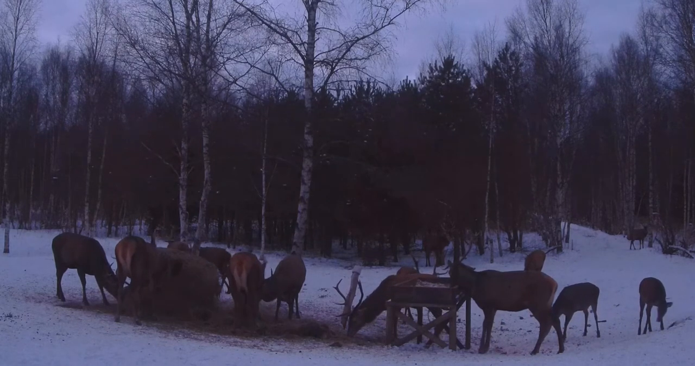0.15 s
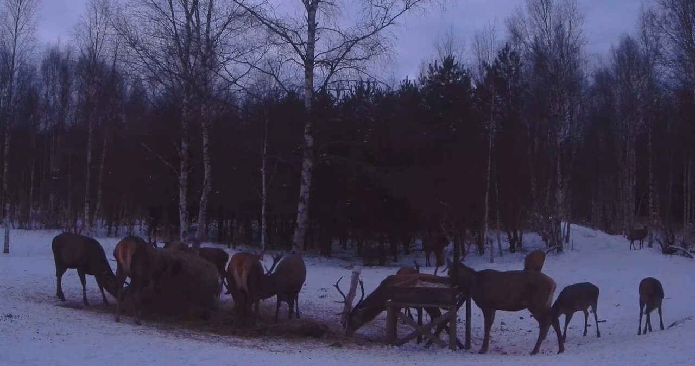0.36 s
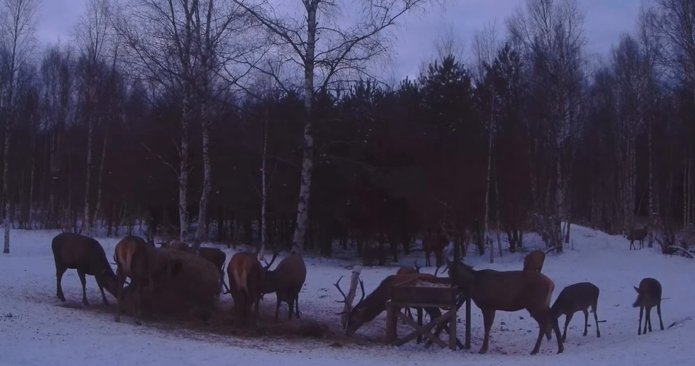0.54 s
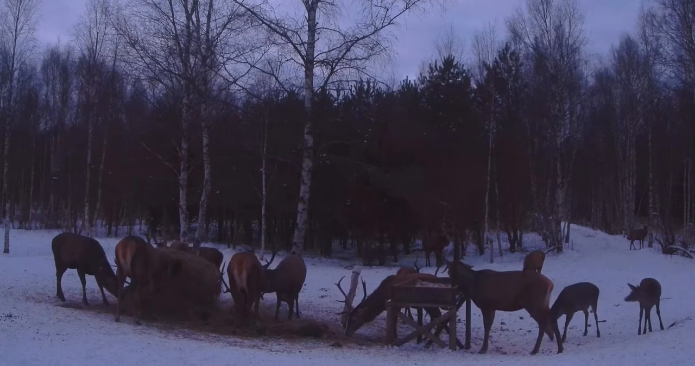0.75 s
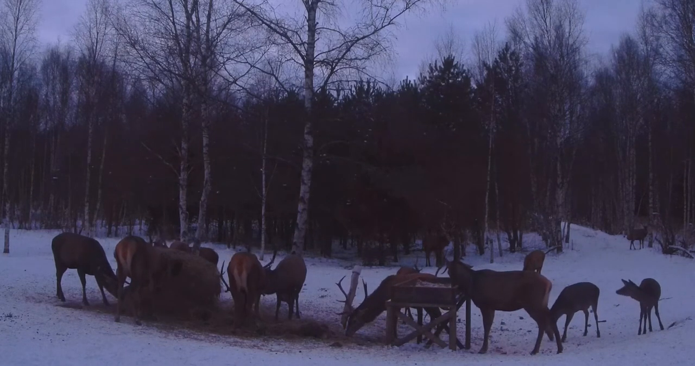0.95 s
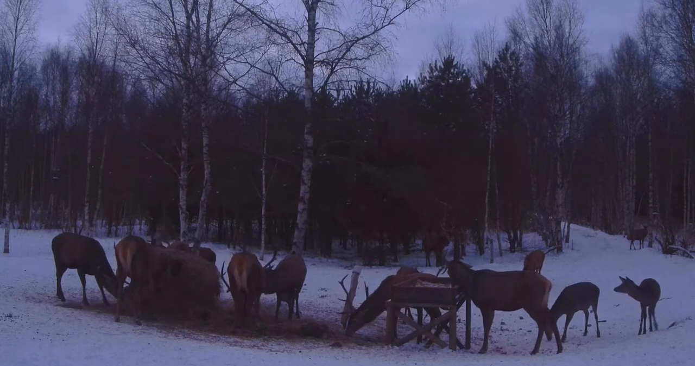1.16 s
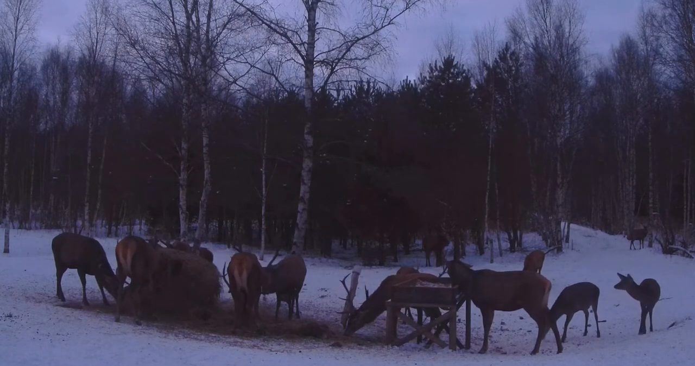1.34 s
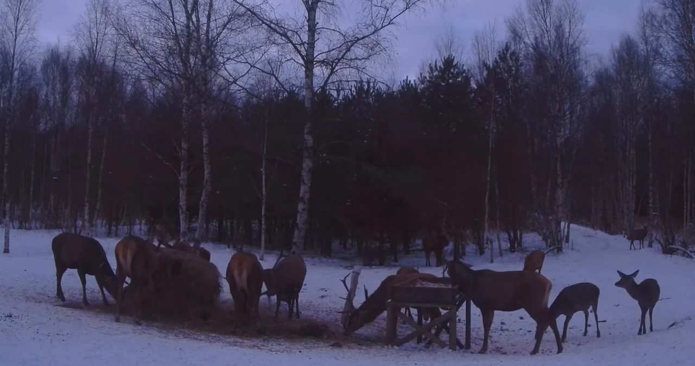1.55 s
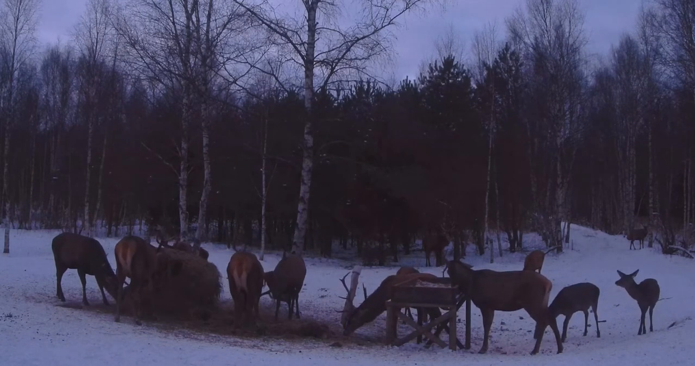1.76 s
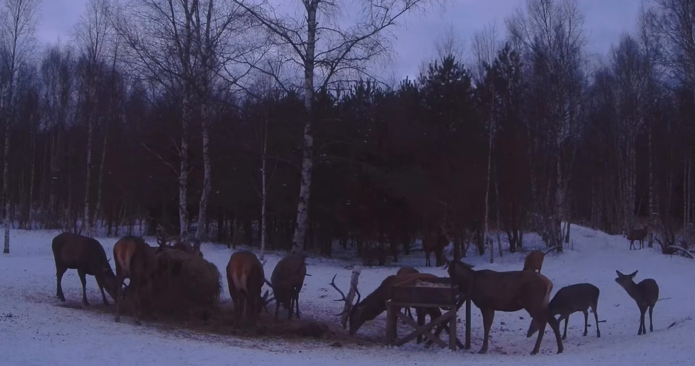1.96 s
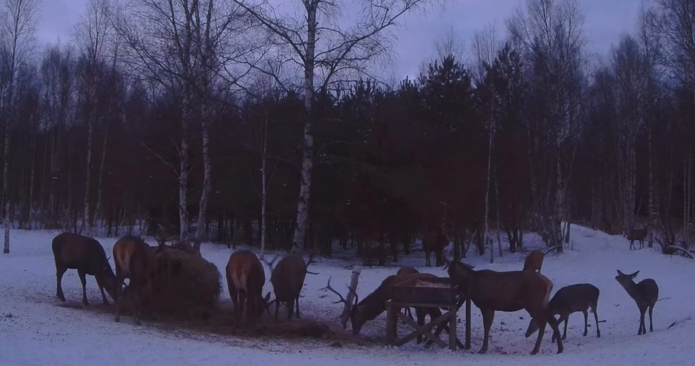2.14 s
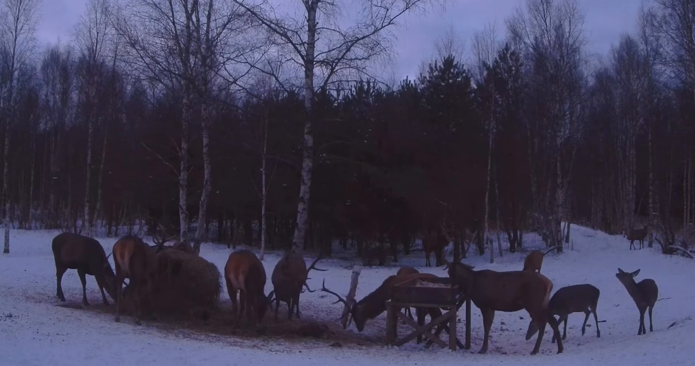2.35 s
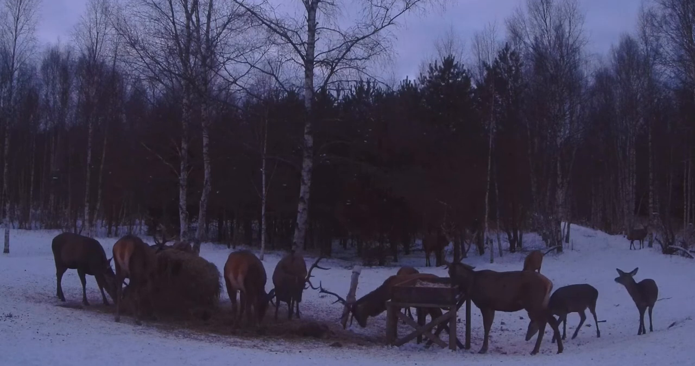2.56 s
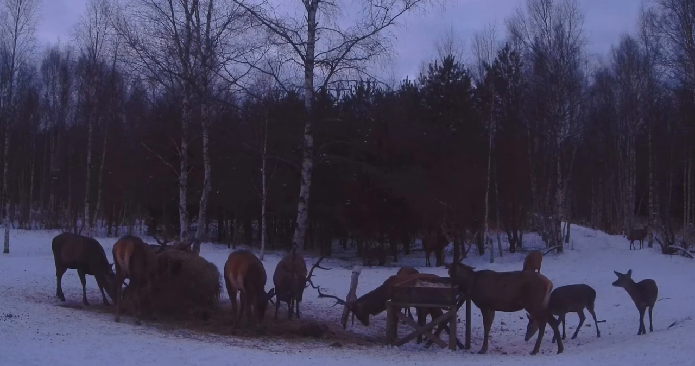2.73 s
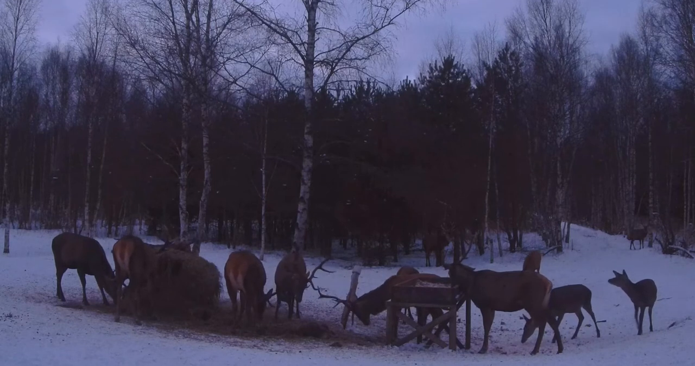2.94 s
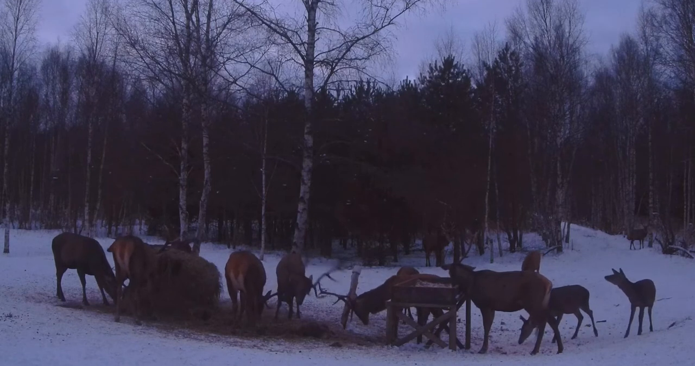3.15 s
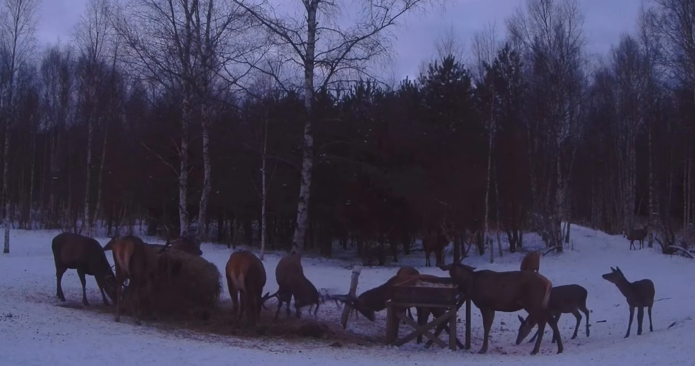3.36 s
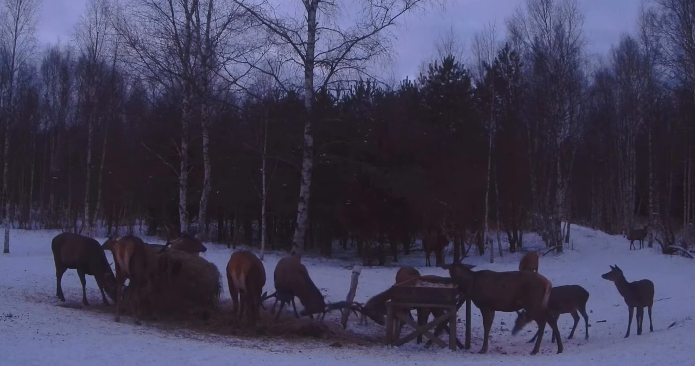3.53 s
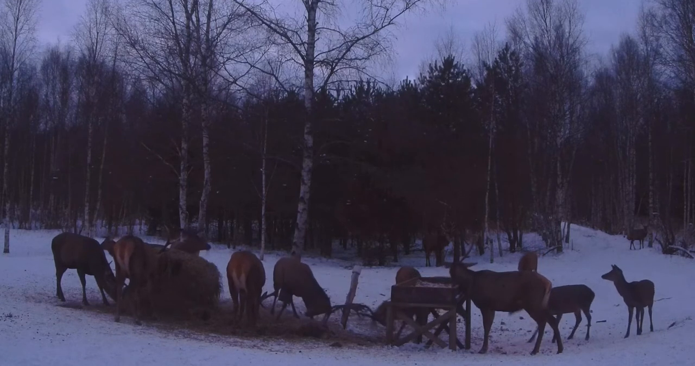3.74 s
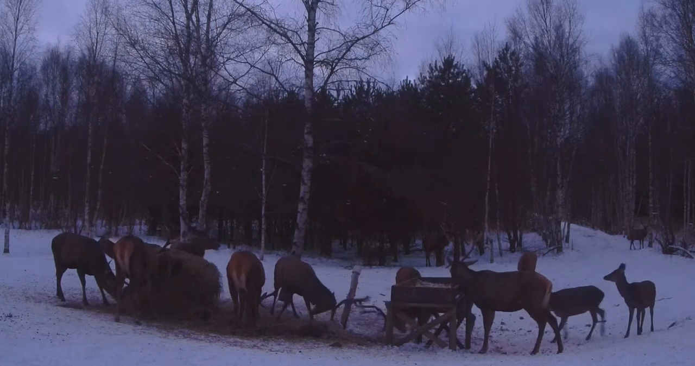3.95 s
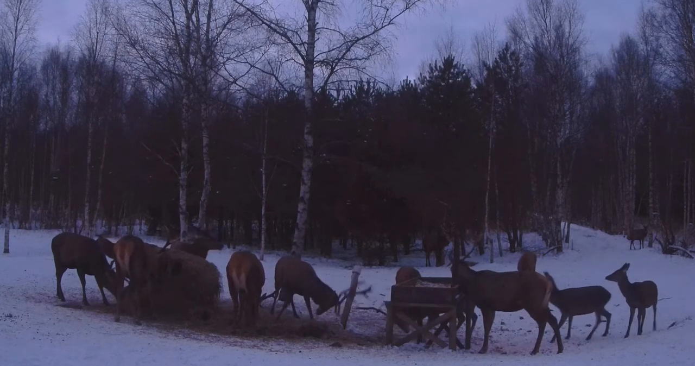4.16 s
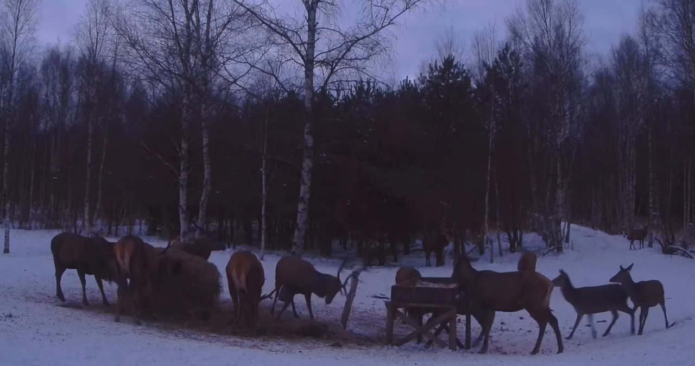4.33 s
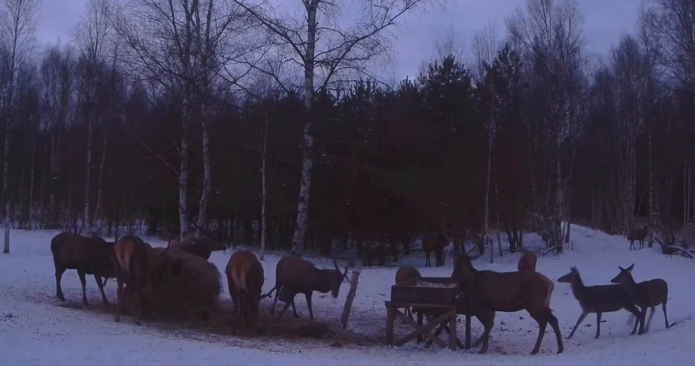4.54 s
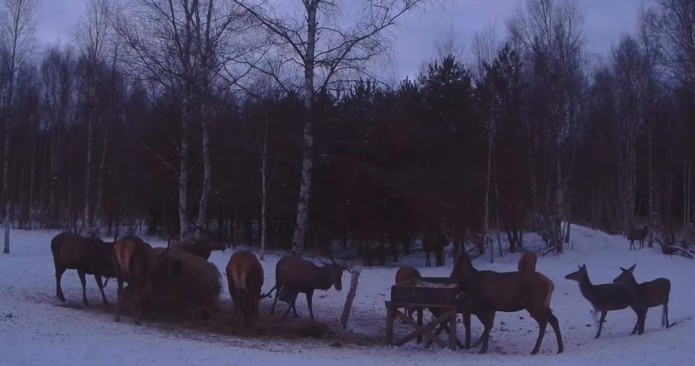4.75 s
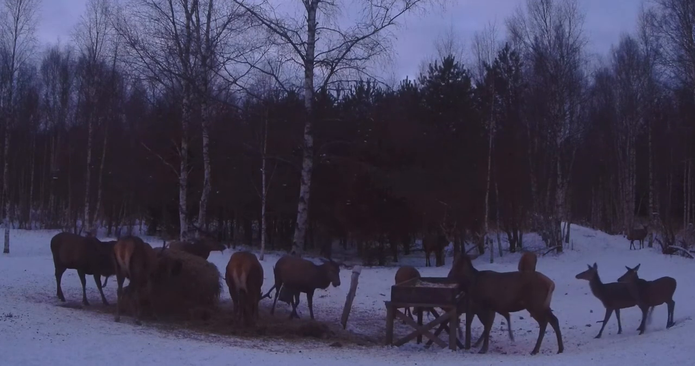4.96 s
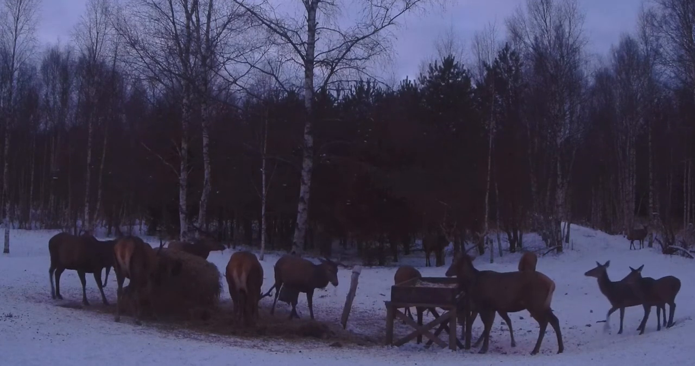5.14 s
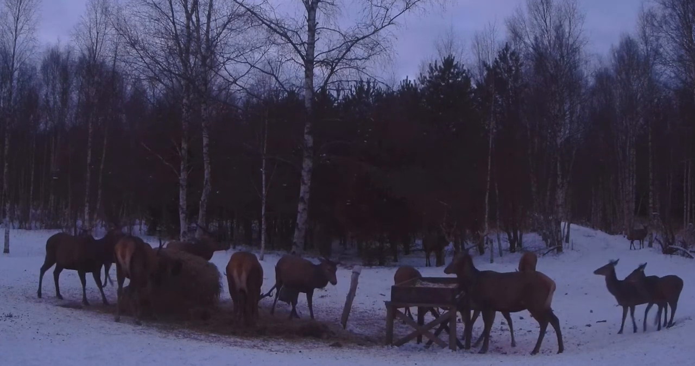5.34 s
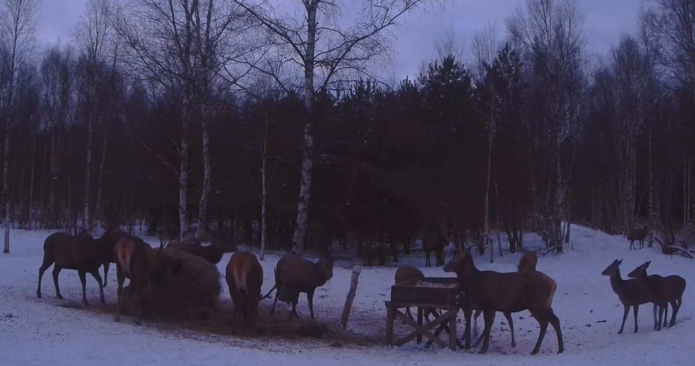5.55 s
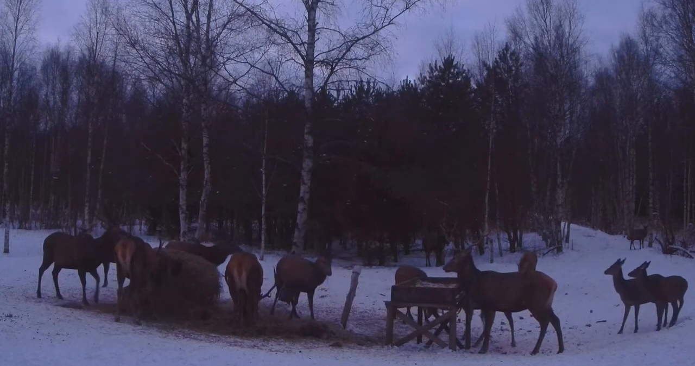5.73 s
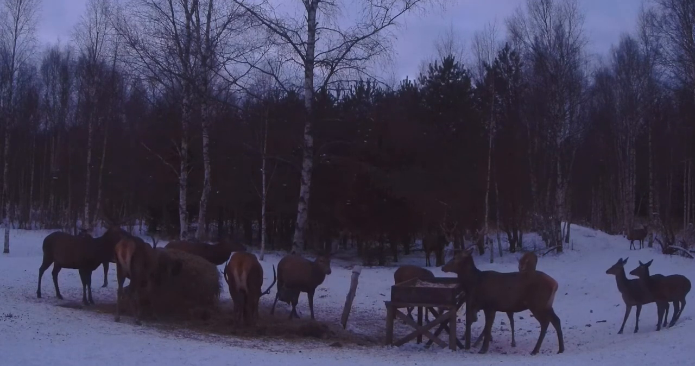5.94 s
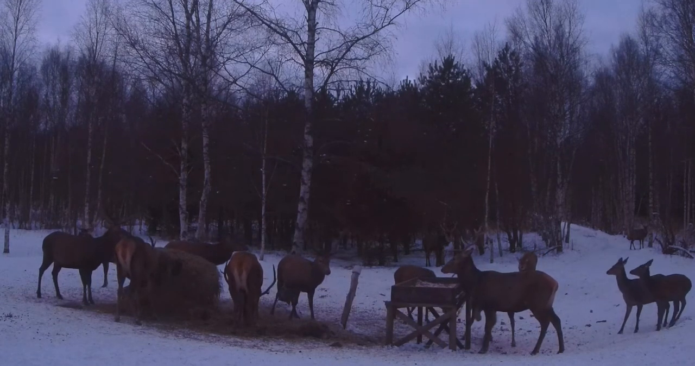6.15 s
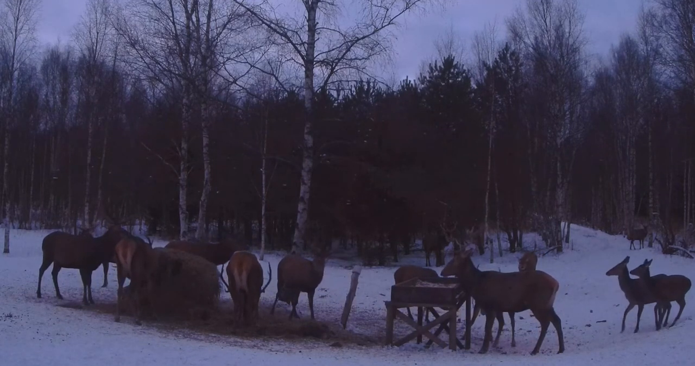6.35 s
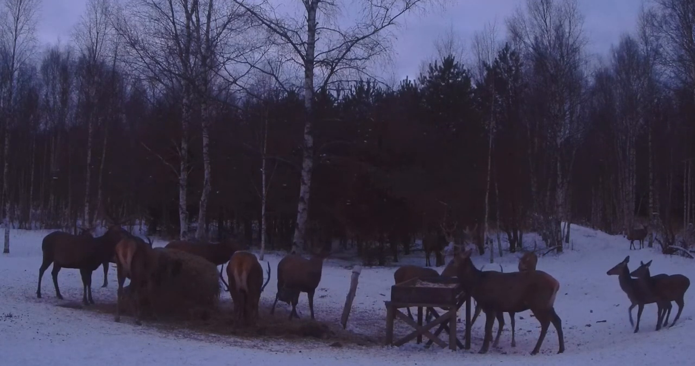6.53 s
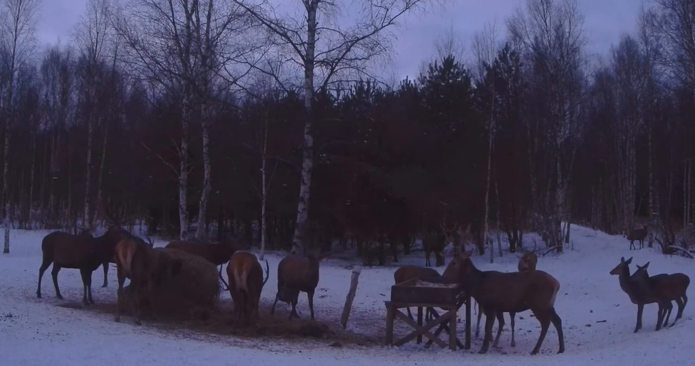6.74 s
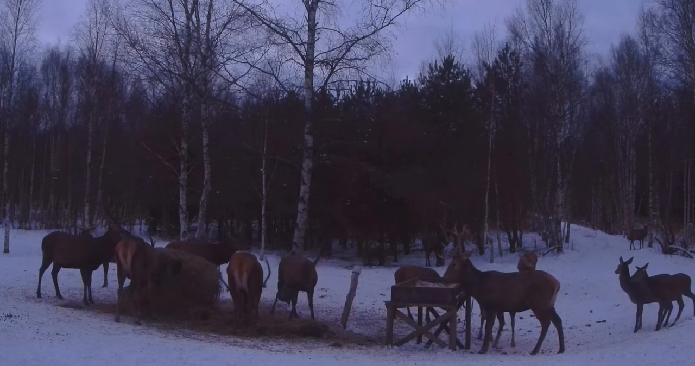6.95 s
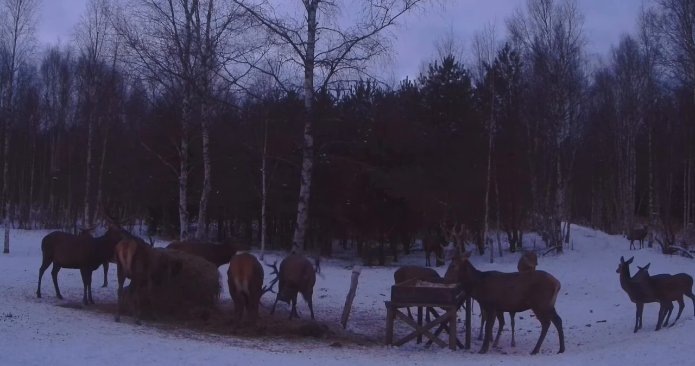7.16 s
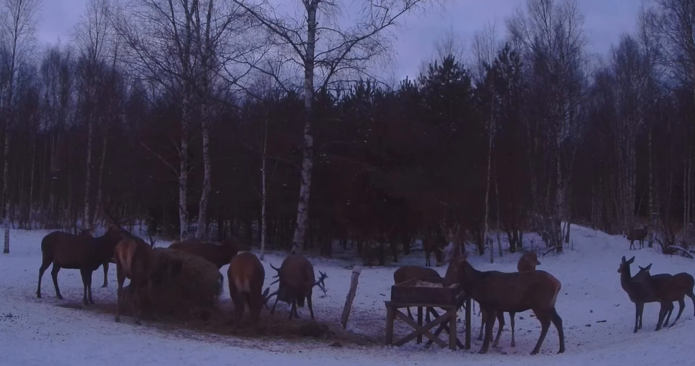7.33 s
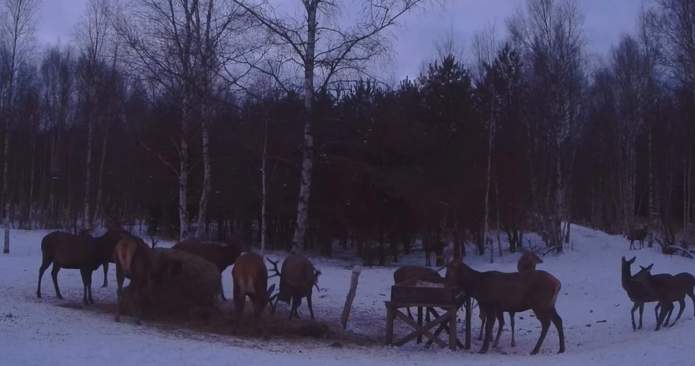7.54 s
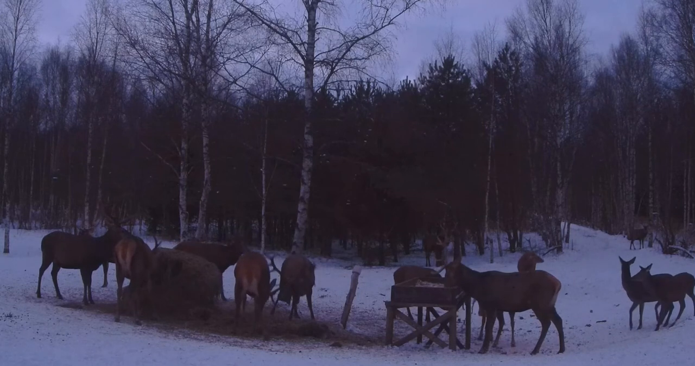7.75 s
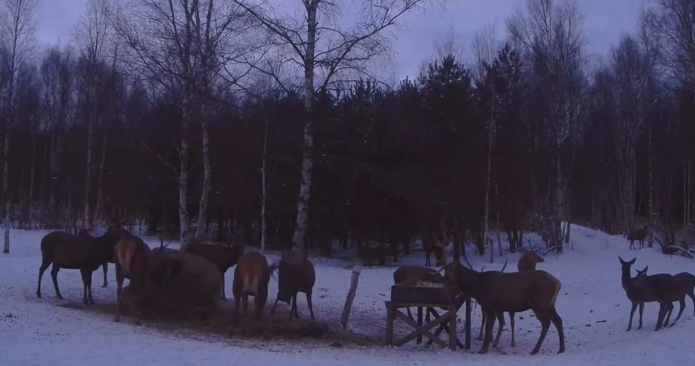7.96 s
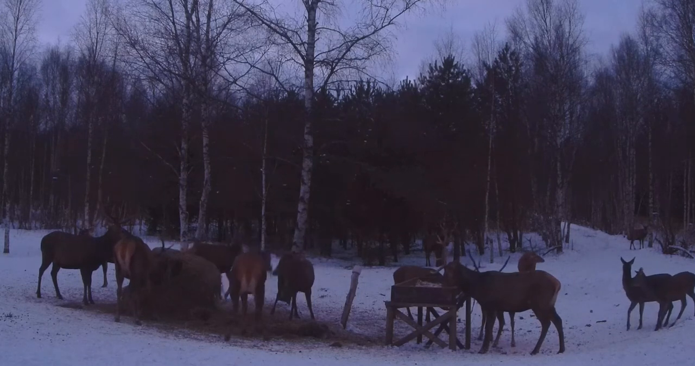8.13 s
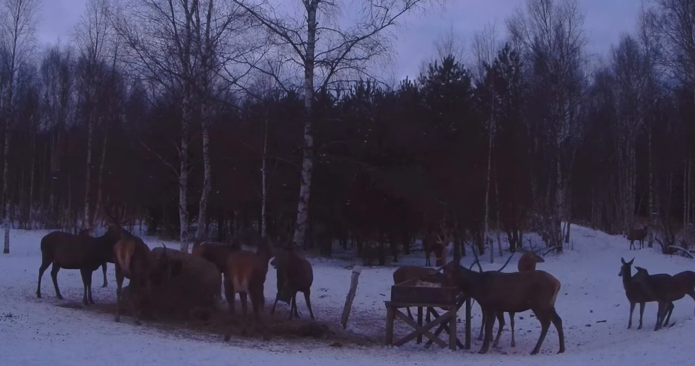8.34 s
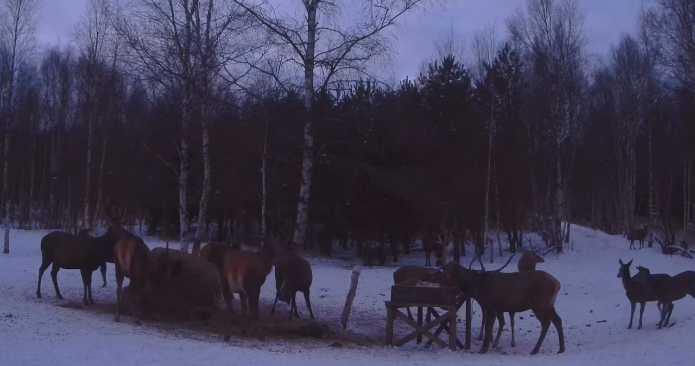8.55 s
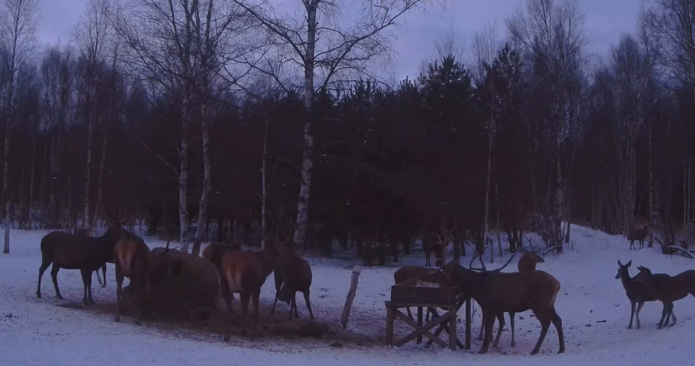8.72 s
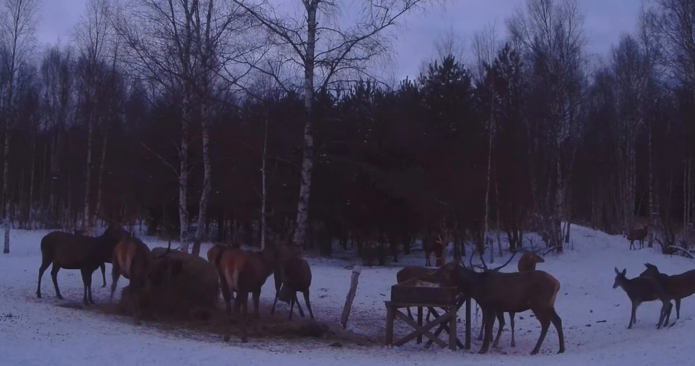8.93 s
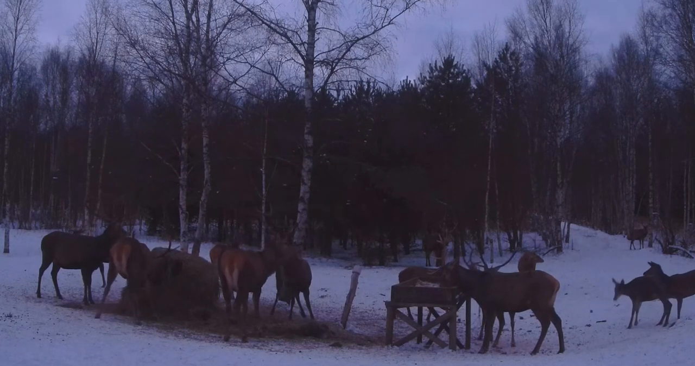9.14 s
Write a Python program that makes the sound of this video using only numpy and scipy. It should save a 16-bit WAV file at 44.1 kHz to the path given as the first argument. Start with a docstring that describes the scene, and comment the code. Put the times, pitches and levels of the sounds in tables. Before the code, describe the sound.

A quiet snowy clearing beside woods, heard in mono from some distance. Very soft hay rustle, light wind rumble and a low far-off drone lie underneath; the drone swells around 3.5 s. A single bony tap comes at 1.6 s, fainter ones at 2.5-2.8 s. At 3.35 s antlers meet with a loud hard crack, followed by rapid clacks and short scrapes until 3.95 s. Another looser, more scraping cluster runs from 4.4 to 4.75 s, with crisp hay crunch and wind bumps. Then mostly calm, with weak taps at 5.6 and 6.5 s. A sharp, bright flurry strikes at 7.1-7.5 s, trailing into small clicks by 7.9 s. Until about 9.2 s only hay crackle, tiny dry snaps and airy swishes remain. Knocks are dry and briefly ringing, with soft scattered echoes from the trees.

```python
"""Deer at a hay pile by the woods

Stags knock antlers in short flurries: cracks, ringing bone modes, grainy slides and soft thumps.
Trees return the knocks and small snaps as long soft tails made of scattered echoes. Hay rustles and
crackles as filtered noise, with small dry ticks and short airy bursts of noise on top.
Light wind rumbles on the microphone and a low far-off drone swells."""
import sys
import numpy as np
from scipy import signal
from scipy.fft import rfft, irfft
from scipy.io import wavfile
from scipy.ndimage import uniform_filter1d

SR = 44100
rng = np.random.default_rng(int(sys.argv[2]) if len(sys.argv) > 2 else 0)


def master(y):
    """Save y as 16-bit WAV."""
    cut = np.clip(np.atleast_2d(y).T, -1, 1)
    pcm = np.round(cut * 32767)  # scale
    wavfile.write(sys.argv[1], SR, pcm.astype(np.int16))


N = 405279  # length in samples


def gain_of(db):
    """Turns decibels into an amplitude factor."""
    return 10 ** (np.asarray(db) / 20)


def evened(x):
    """Scales a signal to an rms of 1."""
    return x / np.sqrt(np.mean(x ** 2) + 1e-20)


def peaked(x):
    """Scales a signal to a peak of 1."""
    return x / abs(x).max()


def fade(t, t60):
    """Exponential decay that falls by 60 dB in t60 seconds."""
    return gain_of(-60 * t / t60)


def read(points, hz):
    """Reads a curve of (pitch, value) points, with straight lines on a log pitch scale."""
    point_hz, value = np.transpose(points)
    return np.interp(np.log(hz + 1), np.log(point_hz + 1), value)


def along(rows, column):
    """Reads one column of a curve over time at every sample."""
    rows = np.array(rows)
    return np.interp(np.arange(N) / SR, rows[:, 0], rows[:, column])


def add(mix, start_s, sound):
    """Adds a sound to the mix in place, cut off at the end of the mix."""
    part = mix[round(start_s * SR):][:len(sound)]
    part += sound[:len(part)]


def colour(x, db_of_hz):
    """Filters x by a gain curve in dB."""
    return irfft(rfft(x) * gain_of(db_of_hz(np.fft.rfftfreq(len(x), 1 / SR))), len(x))


def hiss(points, size, patchy_db):
    """Noise built from random short-time spectra with drifting loud and soft patches, rms 1."""
    frames = 4 * N // size + 5
    hz = np.fft.rfftfreq(size, 1 / SR)
    real, imaginary, patches = rng.standard_normal((frames, len(hz), 3)).T
    patches = uniform_filter1d(patches, size=10, axis=0)  # smooth over pitch
    patches = evened(uniform_filter1d(patches, size=12, axis=1))  # smooth over time
    spectra = (real + 1j * imaginary) * gain_of(read(points, hz)[:, None] + patchy_db * patches)
    noise = signal.istft(spectra, nperseg=size, noverlap=size - size // 4)[1]
    return evened(noise[:N])


def wind():
    """Light wind on the microphone: deep rumbling noise whose level follows the gusts."""
    # gust strength: start_s, level_db
    gust_levels = [(0.0, -56), (3.33, -55), (3.91, -49), (4.27, -56.5), (4.43, -43.5), (4.58, -59.5),
                   (4.68, -45), (5.25, -55), (6.55, -55.5), (6.81, -57.5), (6.96, -48), (7.24, -53.5),
                   (8.11, -54.5), (8.29, -51.5), (9.19, -56.5)]
    # colour of the rumble: pitch_hz, level_db
    rumble_colour = [(3.5, -41.5), (6.0, 2), (35, -1.5), (46, -18.5), (59, -11), (103, -19), (350, -50.5),
                     (2200, -120)]
    return gain_of(along(gust_levels, 1)) * hiss(rumble_colour, size=4096, patchy_db=1.5)


def drone():
    """Far-off drone: low noise that swells and sinks."""
    # loudness of the drone: start_s, level_db
    drone_levels = [(0, -77.5), (1.4, -76), (2.0, -72), (3.3, -70.5), (3.6, -67.5), (5, -75), (9.19, -76.5)]
    # colour of the drone: pitch_hz, level_db
    drone_colour = [(60, -15.5), (110, -8.5), (200, -1), (550, -5.5), (750, -10.5), (1500, -52.5)]
    return gain_of(along(drone_levels, 1)) * hiss(drone_colour, size=2048, patchy_db=1.5)


def trees(x):
    """Scattered echoes from trunks: sparse taps that swell, then die by band; three tails take turns."""
    # how long the echoes last: pitch_hz, fall_by_60_db_s
    echo_lengths = [(200, 0.41), (530, 0.28), (1390, 1), (3680, 0.65), (9700, 0.84)]
    out = np.zeros(N)
    turn = (np.arange(N) / SR * 9).astype(int) % 3  # nine turns a second
    slots = np.arange(300, SR - 20, 20)  # one echo in every 20 samples
    for k in range(3):
        taps = np.zeros(SR)
        taps[slots + rng.integers(0, 20, len(slots))] = rng.choice([-1., 1.], len(slots))
        hz, t, spectra = signal.stft(taps, SR, nperseg=256)
        treble_loss_db = 5.7 * np.log2(hz[:, None] / 2000 + 1)
        shape = fade(t, read(echo_lengths, hz)[:, None]) * gain_of(-treble_loss_db)
        shape = shape * (1 - .5 * np.exp(-(t / 0.03) ** 2))  # starts at half strength
        # trunks stand in groups
        clumps = gain_of(2.5 * evened(uniform_filter1d(rng.standard_normal(len(t)), size=6)))
        tail = signal.istft(spectra * shape * clumps, SR, nperseg=256)[1]
        out += signal.fftconvolve(x * (turn == k), tail / np.linalg.norm(tail))[:N]
    return out


def snap(hz, luck):
    """A short dry tick: a few noisy cycles around one pitch, peak 1."""
    t = np.arange(len(luck)) / SR
    return peaked(colour(luck, lambda f: -9 * np.log2(f / hz + 0.0013) ** 2) * fade(t, 0.0098))


def rustle():
    """Muzzles in hay and hooves in snow: flickering noise plus a fine crackle of tiny random snaps."""
    # strength of the rustle: start_s, level_db, coarseness_db (lifts the crunch below the high treble)
    rustle_levels = [(0.0, -73, -1), (0.74, -76.5, 1.5), (1.48, -73, 1), (1.97, -76.5, -0.5),
                     (2.71, -75, 9.5), (3.3, -76, -0.5), (3.51, -65.5, 9), (4.15, -68.5, 0),
                     (4.37, -68.5, -1), (4.7, -57, 6), (4.94, -66, 8.5), (6.3, -70.5, -9), (7.01, -72.5, 6),
                     (7.32, -68.5, 9), (7.63, -75.5, 14.5), (8.06, -68, 5.5), (8.4, -73.5, 0.5),
                     (9.19, -68, 0)]
    # colour of the rustle: pitch_hz, level_db
    hay_colour = [(290, -34), (500, -9.5), (1400, -12), (5500, -6), (8000, -4), (11000, -5.5), (16500, -13)]
    noise = hiss(hay_colour, size=512, patchy_db=1.5)
    coarse = colour(noise, lambda f: -40 / (1 + (3500 / (f + 1)) ** 3))  # the part below the high treble
    fine = noise - coarse

    # about 400 crackles a second, each with one of eight pitches
    sizes = gain_of(4 * np.minimum(rng.exponential(1, N), 3)) * (rng.random(N) < 400 / SR)
    kind = rng.integers(0, 8, N)
    crackle = np.zeros(N)
    for k, hz in enumerate(np.geomspace(1500, 11000, num=8)):
        crackle += signal.oaconvolve(sizes * (kind == k), snap(hz, rng.standard_normal(400)))[:N]

    flicker = uniform_filter1d(uniform_filter1d(rng.standard_normal(N), size=600), size=600)
    level = gain_of(along(rustle_levels, 1) + 1.3 * evened(flicker))
    crunch = gain_of(along(rustle_levels, 2)) * coarse
    return level * (1.43 * fine + 2.36 * crunch + 0.37 * evened(crackle))


def small_snaps():
    """Small dry snaps and faint antler taps: short noisy ticks, heard directly and from the trees."""
    # snaps and taps: start_s, level_db (peak of the direct sound), pitch_hz
    ticks = [(3.237, -50, 6000), (3.752, -37.5, 3570), (4.409, -37, 6850), (4.7177, -28, 5700),
             (7.366, -44, 4050), (7.937, -47, 1980), (5.512, -52, 4300), (4.545, -41, 6000),
             (7.794, -50.5, 593), (2.9487, -44, 6900), (3.1492, -46, 7440), (3.259, -44, 7640),
             (3.2753, -40, 6960), (3.714, -39, 3770), (4.025, -39, 3740), (5.191, -43, 4470),
             (5.9493, -47.5, 4000), (6.007, -47, 7840), (6.714, -51.5, 4000), (7.167, -33, 4570),
             (7.508, -33.5, 4050), (7.524, -42, 3900), (8.094, -45.5, 5760), (8.489, -45.5, 5450),
             (8.502, -45, 7260), (8.652, -48.5, 7300), (8.674, -44.5, 5800), (8.75, -42.5, 8240),
             (8.89, -49, 5360), (8.4748, -55, 900), (8.529, -61, 905), (8.89, -54.5, 744),
             (9.028, -52.5, 1800), (9.114, -55, 895)]
    snaps = np.zeros(N)
    for (start_s, level_db, hz), luck in zip(ticks, rng.standard_normal((len(ticks), 400))):
        add(snaps, start_s, gain_of(level_db) * snap(hz, luck))
    return snaps + gain_of(-5.0) * trees(snaps)


def airy_bursts():
    """Hay swishes and one brief antler scuff: wide noise that swells and fades around its own pitch."""
    # short airy bursts: middle_s, half_length_s, level_db (rms of the noise before it is shaped), pitch_hz
    bursts = [(0.437, 0.018, -65, 8900), (2.536, 0.043, -64.5, 1440), (4.336, 0.011, -56.5, 5730),
              (7.521, 0.0096, -48, 11050), (7.946, 0.051, -56.5, 9200), (8.055, 0.014, -57.5, 7800),
              (8.492, 0.022, -63, 6860), (8.98, 0.049, -61.5, 7500), (9.12, 0.028, -60, 7000),
              (3.49, 0.0095, -42, 2780), (4.783, 0.079, -57.5, 6240), (8.967, 0.067, -67.5, 2280)]
    out = np.zeros(N)
    for (middle_s, half_s, level_db, hz), luck in zip(bursts, rng.standard_normal((len(bursts), 8192))):
        t = (np.arange(len(luck)) - len(luck) // 2) / SR
        air = evened(colour(luck, lambda f: -8. * np.log2(f / hz + 1e-3) ** 2))
        add(out, middle_s + t[0], gain_of(level_db) * air * np.exp(-(t / half_s) ** 2))
    return out


def nearness_db(f, beam_hz, tine_hz, sharp, floor_db):
    """Level that drops with distance in octaves from the nearer of the two struck pitches."""
    octaves_squared = np.minimum(np.log2(f / beam_hz) ** 2, np.log2(f / tine_hz) ** 2)
    return np.maximum(-sharp * octaves_squared, floor_db)


def bone_ring(beam_hz, tine_hz, t60, luck):
    """Antler bone rings in many fading modes, strongest near the struck beam and tine."""
    # modes of the bone: pitch_hz, level_db
    bone_modes = [(640, -3), (790, 4), (960, 3.5), (1140, 6), (1405, -2.5), (1630, -4), (1920, 2.5),
                  (2250, -6.5), (2750, 1), (3200, 5), (3500, -7.5), (3850, 9.5), (4250, 7.5), (4500, 0.5),
                  (5350, 0.5), (7350, -3.5)]
    split = .016  # each mode is a close pair that beats, as a share of its pitch
    low_rings = .25  # low modes outlast high ones: power of pitch
    t = np.arange(len(luck)) / SR
    hz, mode_db = np.transpose(bone_modes)[:, :, None]
    for struck_hz in (beam_hz, tine_hz):  # the nearest mode takes the pitch of the struck piece
        nearest = abs(np.log(hz / struck_hz)).argmin()
        hz = np.where(np.arange(len(hz))[:, None] == nearest, struck_hz, hz)
    start = np.pi * luck[-len(hz):, None]  # random phases
    level = gain_of(mode_db + nearness_db(hz, beam_hz, tine_hz, 290, -16))
    level = level * fade(t, t60 / (hz / 2000) ** low_rings)
    modes = level * np.sin(2 * np.pi * hz * t + start) * np.cos(2 * np.pi * split * hz * t)
    return modes.sum(0)


def tine_slide(broad, broad_db, beam_hz, tine_hz, t60, luck):
    """Tine slides on tine: noise in grains, wide at first, then only in the struck bands."""
    t = np.arange(len(luck)) / SR
    fading = fade(t, 1.8 * t60)
    struck = colour(luck, lambda f: broad_db(f) + nearness_db(f + 1, beam_hz, tine_hz, 73, -14))
    grains = abs(evened(uniform_filter1d(luck[::-1], size=60)))  # the slide catches and slips
    rasp = (struck + 0.47 * broad * fading) * (0.68 + grains ** 0.52) * fading
    return rasp * np.minimum(t / 0.00039, 1)  # quick fade-in


def knock(level_db, beam_hz, tine_hz, thud_db, edge_db, rise_s, t60, luck):
    """Two antlers meet: crack, ringing bone, slide and thump; returns the near sound and what carries far."""
    # colour of the crack: pitch_hz, level_db
    crack_colour = [(60, -30.5), (150, -10.5), (500, -5), (2000, -2.5), (7000, -7.5), (16500, -31.5)]
    # share of sliding (0-1) in a 30 ms knock; each doubling of the ring time adds some
    slide, slide_per_doubling = 0.42, 0.084
    t = np.arange(len(luck)) / SR
    crack_db = lambda f: read(crack_colour, f)
    broad = colour(luck, crack_db)
    crack = broad * fade(t, 0.0031)
    ring = bone_ring(beam_hz, tine_hz, t60, luck)
    rasp = tine_slide(broad, crack_db, beam_hz, tine_hz, t60, luck)
    # skulls and necks take the blow
    thump = colour(luck, lambda f: -4. * np.log2(f / 230 + 1e-3) ** 2) * fade(t, 0.25)

    share = np.clip(slide + slide_per_doubling * np.log2(t60 / .03), 0, 1)
    # first row: the whole slide; second row: only its start carries to the trees
    slid = share * peaked(rasp) * np.array([np.ones(len(t)), fade(t, 0.018)])
    parts = (1 - share) * peaked(ring) + slid + 0.69 * peaked(crack) + 0.032 * peaked(thump)
    parts = parts * np.clip(t / max(rise_s, 1 / SR), 0, 1)  # a sliding contact builds up

    def shelves(f):
        """A broad blow adds weight below, a glancing one brightness above."""
        return thud_db / (1 + (f / (0.94 * beam_hz)) ** 4) + edge_db / (1 + (6500 / (f + 1)) ** 4)

    near, far = (colour(np.pad(part, (64, 0)), shelves) for part in parts)
    return gain_of(level_db) * peaked(near), gain_of(level_db) * peaked(far)


def antlers():
    """Stags knock their antlers together; each knock arrives direct and again from the trees."""
    # knocks: start_s, level_db (peak of the direct sound), beam_hz (thick beam), tine_hz (thin tine),
    # thud_db (low shelf), edge_db (high shelf), rise_s, ring_s (60 dB fall at 2000 Hz)
    blows = [(1.644, -29, 1410, 2770, -3.5, 11, 0.00047, 0.031),
             (2.5, -40.5, 990, 2060, 3, 12, .0004, 0.038),
             (2.5194, -42.5, 2220, 3130, 12, 6, 0.00078, 0.023),
             (2.765, -45.5, 1760, 2530, 14, 5, 0.0011, 0.024),
             (3.3518, -9.5, 1190, 1923, -4.5, 11, 0.00017, 0.014),
             (3.3565, -21, 675, 1000, 4, 2, 0.0021, 0.045),
             (3.3998, -24.5, 620, 2900, 1.5, 14, .0006, .018),
             (3.4123, -24.5, 2690, 8650, -4, -4, 0.0017, 0.022),
             (3.442, -36, 1980, 3740, 0.5, 20, 0.0016, 0.015),
             (3.455, -12, 3297, 5480, -9.5, -9.5, 0.00085, 0.029),
             (3.52, -32.5, 2880, 3500, -14, -13, 0.00074, 0.019),
             (3.6962, -30.5, 2250, 4100, 3, 4, 0.0008, 0.013),
             (3.767, -32, 1880, 3570, -3, -20, 0.0032, 0.017),
             (3.7763, -30, 935, 4720, -12, -6, 0.00051, 0.044),
             (3.8232, -31.5, 900, 3700, -10, 10, 0.00043, 0.031),
             (3.8367, -28, 1580, 3740, 0.5, 3, 0.00048, 0.077),
             (3.8543, -11, 2720, 4410, -16, -24, 0.0016, 0.021),
             (3.867, -21, 980, 4970, 1, 23, 0.00046, 0.022),
             (3.9421, -13.5, 2250, 7470, -10, 11, 0.00045, 0.019),
             (4.4189, -20.5, 3080, 4360, -2, 3, 0.0013, 0.024),
             (4.4227, -25.5, 686, 3760, -7.5, 5.5, 0.00067, 0.1),
             (4.4801, -24, 800, 2030, 1, 2, 0.0014, 0.022),
             (4.487, -29.5, 1600, 2775, -8.5, -4, 0.0043, 0.12),
             (4.6395, -19, 1597, 3164, 3.5, 7, 0.0019, 0.069),
             (4.6742, -21.5, 2945, 7100, -14, -8.5, 0.00063, 0.089),
             (4.6892, -29.5, 1760, 3020, 9, -8, 0.0019, 0.056),
             (4.7395, -23, 1576, 3100, -8.5, -9, 0.0035, 0.031),
             (5.6027, -39.5, 1430, 2770, -11.5, 3.5, 0.00056, 0.021),
             (6.4723, -27.5, 900, 1845, -2, -9.5, 0.00053, 0.04),
             (6.513, -43.5, 985, 1830, 0, 0, 0.0015, 0.075),
             (6.8415, -51.5, 1974, 2290, -4, -17, 0.003, .035),
             (7.0942, -11.5, 1040, 4320, -8.5, 17.5, 0.000085, 0.045),
             (7.1107, -18.5, 1356, 3230, -1, 5, 0.001, 0.028),
             (7.127, -24.5, 1100, 4700, -23, 18.5, 0.00033, 0.016),
             (7.1482, -15.5, 1730, 3760, -6.5, 2.5, 0.00066, 0.028),
             (7.261, -18.5, 2140, 5230, -14.5, -3, 0.00049, 0.026),
             (7.321, -37.5, 2050, 3770, -3, -8, .0005, 0.0083),
             (7.3478, -21, 1326, 4330, -15, 2, 0.001, 0.018),
             (7.4782, -29.5, 1930, 2555, -10, -37, 0.00067, 0.023),
             (7.494, -38, 1710, 2510, 7, 6, 0.0018, 0.23),
             (7.804, -32, 2430, 4600, -46, -1, 0.00051, 0.0078),
             (7.9236, -35.5, 2100, 3740, -2.5, 17.5, 0.00099, 0.064)]
    echo_db, echo_per_db = -11.5, -0.02  # echo of a -25 dB knock; softer knocks get slightly more
    # hard blows come back as crack, soft ones with their ring: 60 dB fall of a -25 dB knock
    echo_keeps_s = 0.08
    dry, sent = np.zeros(N), np.zeros(N)
    for (start_s, level_db, *blow), luck in zip(blows, rng.standard_normal((len(blows), 6000))):
        near, far = knock(level_db, *blow, luck)
        add(dry, start_s - 64 / SR, near)  # the knock has 64 samples of lead-in
        louder_db = level_db + 25
        opening = fade(np.arange(len(far)) / SR, echo_keeps_s * gain_of(-louder_db))
        add(sent, start_s, gain_of(echo_db + echo_per_db * louder_db) * far * opening)
    return dry + trees(sent)


def scene():
    """Sums all layers, from the background to the antlers, into one channel."""
    return (wind() + drone() + rustle() + small_snaps() + airy_bursts() + antlers())[None]


def record(dry):
    """The microphone loses treble, then a steep low-pass filter removes the top."""
    # treble roll-off: pitch_hz, level_db
    treble_loss = [(7500, 1), (9500, -4.5), (12500, -11), (15000, -11), (16500, -31.5)]
    edge_hz = 16300
    heard = colour(dry[0], lambda f: read(treble_loss, f))[None]
    low_pass = signal.firwin(511, edge_hz, window=("kaiser", 9), fs=SR)
    return signal.oaconvolve(heard, low_pass[None], "same")


dry = scene()
out = record(dry)
master(out)
```